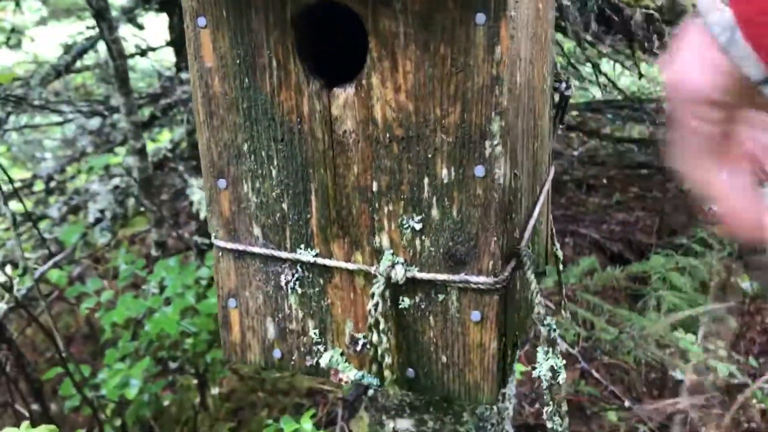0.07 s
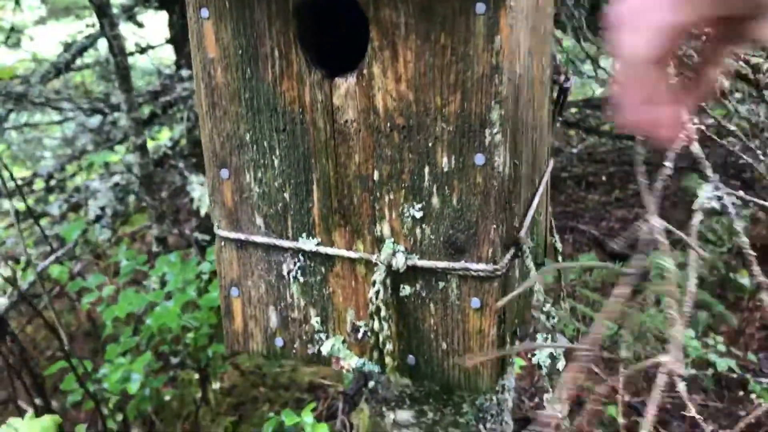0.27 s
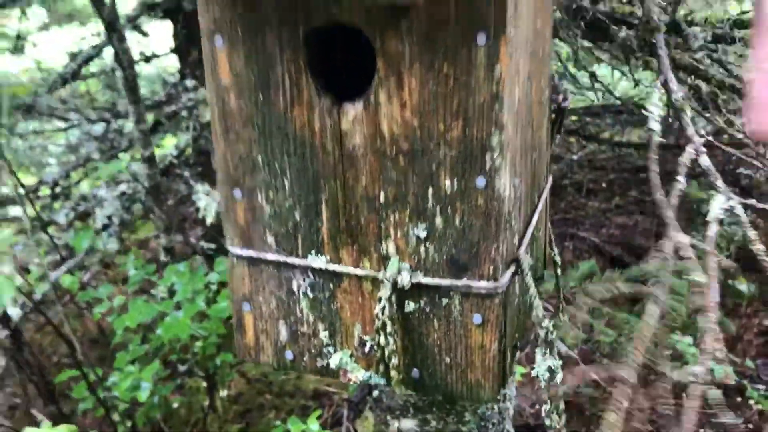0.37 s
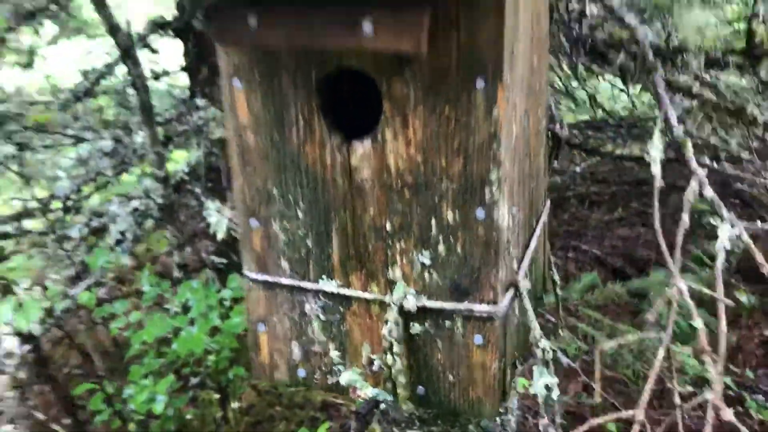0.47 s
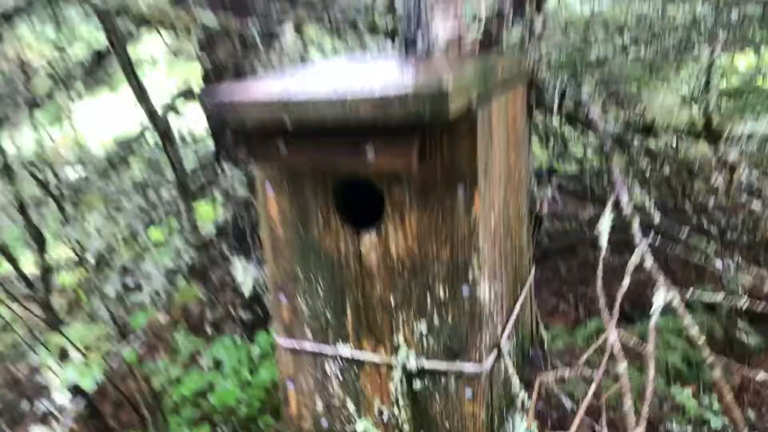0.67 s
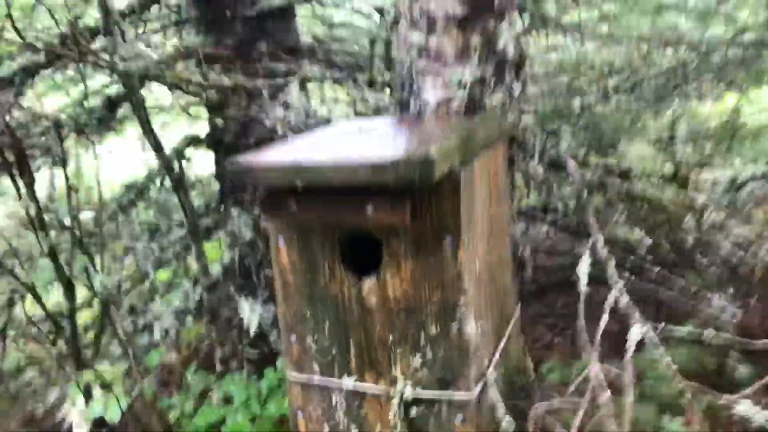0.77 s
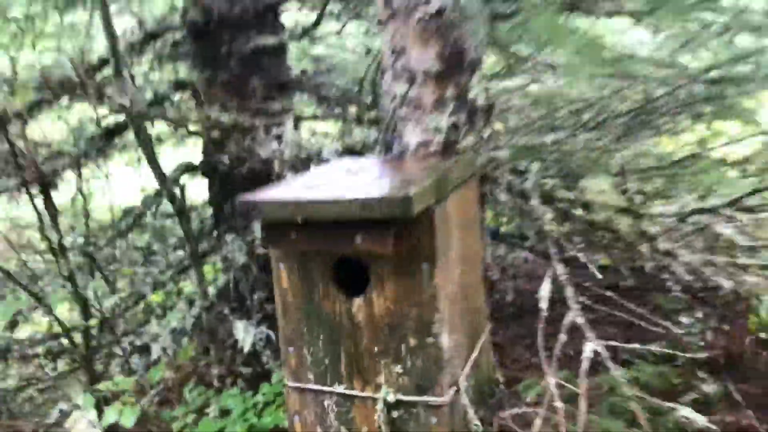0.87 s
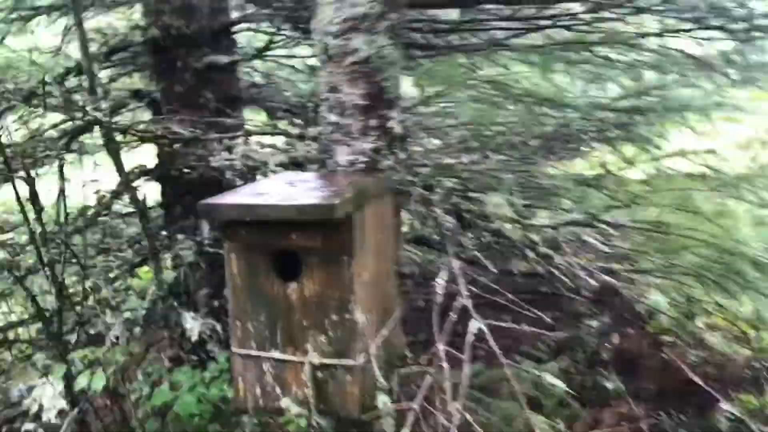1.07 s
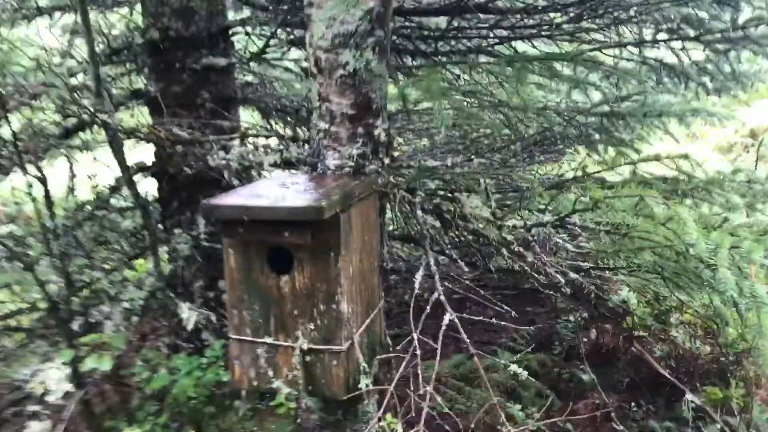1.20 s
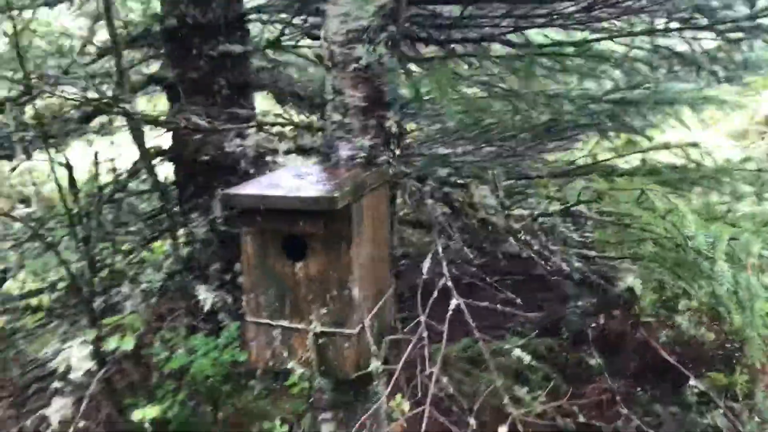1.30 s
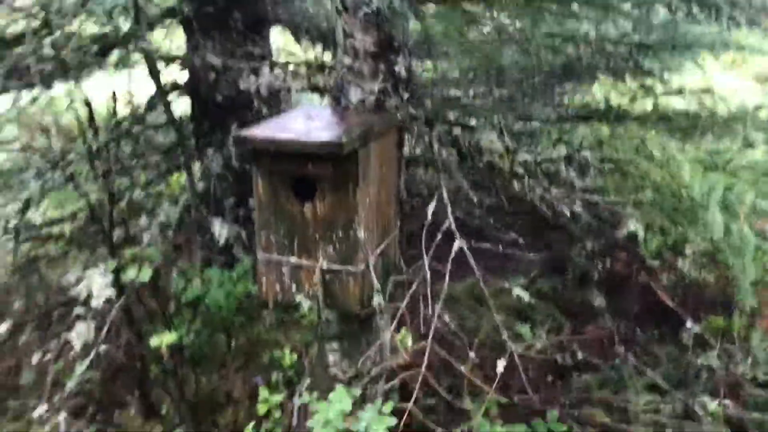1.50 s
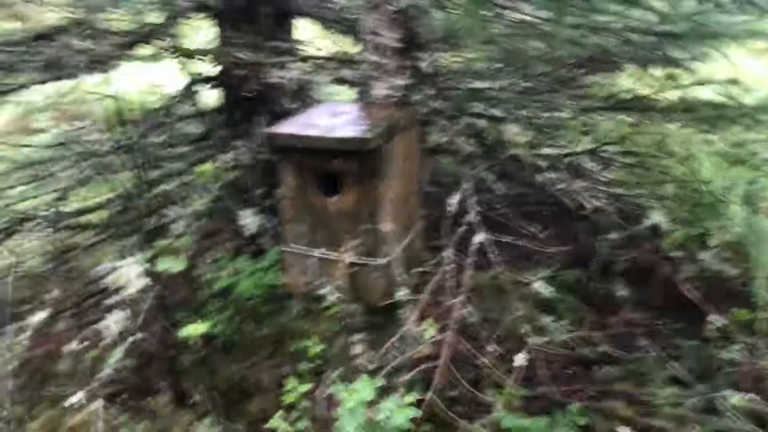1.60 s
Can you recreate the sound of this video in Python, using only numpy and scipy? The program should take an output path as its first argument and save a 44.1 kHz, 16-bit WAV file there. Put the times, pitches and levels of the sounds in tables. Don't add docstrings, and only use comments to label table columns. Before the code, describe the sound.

Knuckles knock on a hollow wooden nest box, then soft steps crunch through quiet woodland litter

```python
import sys
import numpy as np
from scipy import signal
from scipy.fft import rfft, irfft, next_fast_len
from scipy.io import wavfile
from scipy.ndimage import uniform_filter1d, map_coordinates

SR = 44100
rng = np.random.default_rng(int(sys.argv[2]) if len(sys.argv) > 2 else 0)


def file_out(sig):
    cols = np.atleast_2d(sig).T
    lim = np.clip(cols, -1, 1)
    pcm = np.round(lim * 32767).astype(np.int16)
    wavfile.write(sys.argv[1], SR, pcm)


def boost(x):
    u = np.asarray(x, float) / 20
    return 10 ** u


N = 72765


def box():
    # start_s, boom_db, crack_over_boom_db
    knocks = [
        (-.0068, -25.5, 0),
        (-.0006, -25, -8),
        (.2129, .3, 0.5),
    ]
    # pitch_hz, level_db, t60_s, lag_s
    air_modes = [(155.2, -0.5, 0.076, 0.0047), (181, 22, 0.023, 0.00625), (249.4, 6.5, 0.028, 0.0031),
                 (337, -4, .028, .0012), (152, -17, .14, 0.0051)]
    # pitch_hz, level_db, t60_s, lag_s
    plank_modes = [(535, -27, .032, 0.0029), (700, -20, .011, .0031), (995, -30, .026, .0003),
                   (1215, -34, .018, 0.0032), (1450, -32, .01, .0006), (1750, -25, 0.0076, .0001),
                   (3000, -36, .012, .0008), (3400, -37.5, 0.0099, 0.00095), (3890, -30.5, 0.0082, .0001)]
    crack_db, crack_t60_s = -37, 0.011
    out = np.zeros(N)
    t = np.arange(N) / SR
    for start_s, boom_db, hard_db in knocks:
        for hz, level_db, t60_s, lag_s in air_modes:
            add_ring(out, start_s + lag_s, boom_db + level_db, hz, t60_s, rise_s=0.0134)
        for hz, level_db, t60_s, lag_s in plank_modes:
            add_ring(out, start_s + lag_s, boom_db + hard_db + level_db, hz, t60_s, rise_s=0.00032)
        decay_db = -60 * abs(t - start_s) / crack_t60_s
        crack = boost(boom_db + hard_db + crack_db + decay_db) * rng.standard_normal(N)
        out += (t > start_s) * crack
    return out


def steps():
    # start_s, level_db, pitch_hz (minus: first pull), t60_s
    thuds = [(.6994, -32, -310, .011), (0.7, -41, 134, 0.038), (0.734, -37.5, 195, 0.019),
             (.742, -50, 500, 0.007), (.433, -45, 403, 0.017), (.525, -47, 604, 0.017),
             (.81, -50, 326, .03), (.915, -48.5, 151, 0.037), (1.012, -49, 107, 0.073),
             (1.035, -49.5, 300, 0.034), (1.218, -45, 54, 0.11), (1.332, -43.5, -55, .35),
             (1.332, -42, 118, 0.039), (1.483, -40, 302, 0.021), (1.526, -47, 238, 0.039),
             (1.613, -46.5, 241, 0.022)]
    # start_s, level_db, pitch_hz (minus: first pull), t60_s
    snaps = [(.137, -46.5, 3120, .004), (.668, -37, 9000, .001), (.7004, -37, 5000, 0.0014),
             (.7003, -33, -640, .007), (.716, -27, 3400, 0.00087), (.716, -36.5, 11000, 0.00074),
             (.9293, -39, 2200, 0.0023), (.9365, -36, 3280, 0.0022), (.9402, -35, 3420, 0.0029),
             (1.0355, -33.5, 2500, 0.0024), (1.0385, -34, 2220, 0.0017), (1.2105, -44, 1070, 0.0074),
             (1.2105, -42.5, 597, 0.0094), (1.211, -45, 2370, .004), (1.2386, -49, 11000, .001),
             (1.272, -42, 8000, .001), (1.4836, -42, 3600, .002), (1.4841, -42, -680, .008),
             (1.6445, -37, 3480, .003)]
    # start_s, level_db, pitch_hz (minus: first pull), t60_s, rise_s
    stick_pop = (1.4833, -9, -1190, .008, .0016)
    rise_cycles = 0.31
    out = np.zeros(N)
    for start_s, level_db, hz, t60_s in thuds + snaps:
        add_ring(out, start_s, level_db + 5, hz, t60_s, rise_cycles / abs(hz))
    add_ring(out, *stick_pop)
    return out


def litter():
    # start_s, spread_s, level_db, pitch_hz
    crunches = [(.3, .03, -66, 4500), (0.421, 0.047, -70, 3160), (0.909, 0.0059, -61, 4500),
                (.927, .009, -59, 2500), (.938, .003, -56, 11000), (.96, 0.031, -69, 3800),
                (1.025, 0.018, -59.5, 3000), (1.01, .05, -65, 1310), (1.036, 0.0045, -53, 13000),
                (1.118, .014, -62, 3240), (1.31, .02, -65.5, 2130), (1.31, .045, -62.5, 10000),
                (1.608, .003, -56.5, 3230), (1.608, 0.0086, -58, 8900), (1.6313, .0015, -47, 10400),
                (1.6327, 0.0054, -59, 6500), (1.636, 0.011, -61, 4000)]
    grains_per_s, pitch_spread, decay_cycles, scatter_db = 1800, 0.27, 1.27, 4.5
    out = np.zeros(N + SR)
    k = np.arange(160)
    for start_s, spread_s, level_db, hz in crunches:
        count = int(2 * spread_s * grains_per_s) + 8
        draw = rng.standard_normal((400, 3))[:count]
        start = ((start_s + spread_s * abs(draw[:, :1])) * SR).astype(int)
        ratio = np.exp(pitch_spread * draw[:, 1:2])
        cycles = np.minimum(hz * ratio, 15500) * k / SR
        swing = np.exp(-cycles / decay_cycles) * np.sin(2 * np.pi * cycles)
        grains = boost(level_db + 9 + scatter_db * draw[:, 2:]) * ratio * swing
        out += np.bincount((start + k).ravel(), grains.ravel(), N + SR)[:N + SR]
    return out[:N]


def boot():
    # start_s, length_s, top_hz, level_db, peak_share (of length)
    squeaks = [
        (0.297, .05, 4220, -64.5, .5),
        (.432, .12, 4473, -56.5, 0.36),
        (.45, .115, 3260, -66, .55),
        (1.2, .14, 4560, -63, 0.32),
    ]
    start_ratios = [0.97, 0.8, .78, .81]
    settle_s, octave_db, flutter_db = .036, -6, 2.5
    peak_width, tail_db = .18, -7
    out = np.zeros(N)
    for (start_s, length_s, top_hz, level_db, peak), start_ratio in zip(squeaks, start_ratios):
        t = np.clip(np.arange(N) / SR - start_s, 0, length_s)
        climb = 1 - (1 - start_ratio) * np.exp(-(t / settle_s) ** 1.84)
        pitch_hz = top_hz * climb * (1 + 0.0049 * wobble(150))
        u = t / length_s
        bump = np.exp(-((u - peak) / peak_width) ** 2)
        tail = boost(tail_db) * np.sqrt(abs(np.sin(np.pi * u)))
        shape = (bump + tail) * (u > 0) * (u < 1)
        phase = 2 * np.pi * np.cumsum(pitch_hz) / SR
        octave = boost(octave_db) * (top_hz < 4000) * np.sin(2 * phase)
        out += shape * boost(level_db + 3.5 + flutter_db * wobble(90)) * (np.sin(phase) + octave)
    return out


def trunks(x):
    echo_db, t60_s, dull_hz = -28.5, 0.18, 900
    t = np.arange(SR // 3) / SR
    tail = rng.standard_normal(len(t)) * boost(-60 * t / t60_s) * (t > .006)
    wet = signal.fftconvolve(x, tail / np.linalg.norm(tail))[:N]
    return boost(echo_db) * filtered(wet, lambda hz: 1 / (1 + 1j * hz / dull_hz))


def ambience():
    # time_s, hiss_db, rumble_db
    movement = [(0, -60.5, -62), (.3, -59.5, -67), (.52, -59, -64), (.62, -61, -69), (.8, -61, -64),
                (.88, -62.5, -60.5), (.95, -62, -59.5), (1.1, -60, -60), (1.18, -61.5, -63),
                (1.3, -61.5, -62), (1.39, -59, -55), (1.415, -66.5, -60.5), (1.59, -64, -58),
                (1.65, -58, -65)]
    # freq_hz, density_db (per Hz)
    hiss_spectrum = [(1500, -12.5), (3000, -1.5), (4300, 0), (5200, -4), (9000, -3.5), (10500, -7.5),
                     (12000, -4), (15750, -5)]
    # freq_hz, density_db (per Hz)
    wood_spectrum = [(90, -7), (200, 1), (450, -4.5), (750, -6), (1100, -1.5), (1500, -7.5), (2200, -13),
                     (5000, -26.5)]
    # freq_hz, density_db (per Hz)
    rumble_spectrum = [(20, -24), (35, -4), (55, 1.5), (90, -6), (140, -13.5), (200, -50)]
    wood_db, wood_follows, hiss_over_db = -60.5, 0.34, 2
    time_s, hiss, low = np.transpose(movement)
    t = np.arange(N) / SR
    hiss_db = np.interp(t, time_s, hiss)
    rumble_db = np.interp(t, time_s, low)
    hiss_gain = boost(hiss_db + hiss_over_db + .7 * wobble(40.04) + 0.72 * wobble(11.78))
    out = hiss_gain * rush(hiss_spectrum, patchy_db=1.4)
    wood_gain = boost(wood_db + wood_follows * (hiss_db - hiss_db.mean()) + 1.56 * wobble(15))
    out += wood_gain * rush(wood_spectrum, patchy_db=1.57)
    return out + boost(rumble_db + 2.7 * wobble(12)) * rush(rumble_spectrum, patchy_db=0.2)


def add_ring(out, start_s, level_db, hz, t60_s, rise_s):
    first = max(int(start_s * SR) + 1, 0)
    k = np.arange(first, min(int((start_s + 1.5 * t60_s) * SR), N))
    t = k / SR - start_s
    rise = (1 - np.exp(-t / rise_s)) ** 2
    out[k] += boost(level_db - 60 * t / t60_s) * rise * np.sin(2 * np.pi * hz * t)


def rush(spectrum, patchy_db):
    z = signal.stft(rng.standard_normal(N), nperseg=512)[2]
    field = uniform_filter1d(rng.standard_normal(z.shape), size=8, axis=0)
    field = uniform_filter1d(field, size=8, axis=1)
    x = signal.istft(z * boost(patchy_db * unit(field)), nperseg=512)[1][:N]
    f, db = np.transpose(spectrum)

    def colour(hz):
        return boost(np.interp(np.log(hz + 1), np.log(f), db, left=-120, right=-120))
    return unit(filtered(x, colour))


def unit(x):
    return x / np.sqrt(np.mean(x ** 2) + 1e-20)


def wobble(rate_hz):
    knots = rng.standard_normal(int(N * rate_hz / SR) + 4)
    return map_coordinates(knots, [np.arange(N) * rate_hz / SR])


def filtered(x, response):
    m = next_fast_len(N + SR // 2)
    return irfft(rfft(x, m) * response(np.fft.rfftfreq(m, 1 / SR)), m)[:N]


def scene():
    near = box() + steps() + litter()
    return (near + trunks(near) + boot() + ambience())[None]


def band_limit(x):
    return signal.sosfilt(signal.butter(12, 16790, fs=SR, output="sos"), x)


def record(dry):
    port_hz, top_hz = 42, 15900
    mic = filtered(dry[0], lambda hz: (hz < top_hz) * (1j * hz / (port_hz + 1j * hz)) ** 2)
    return band_limit(mic[None])


dry = scene()
out = record(dry)
file_out(out)
```